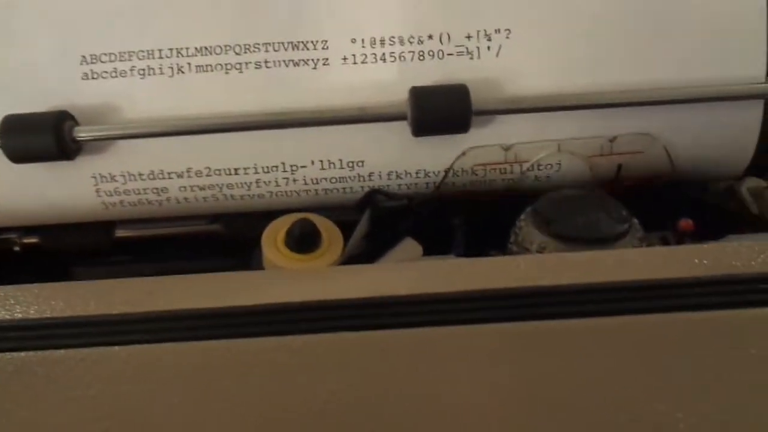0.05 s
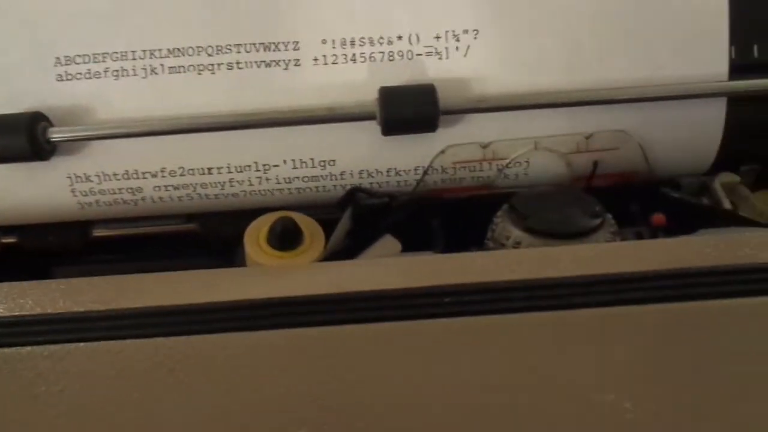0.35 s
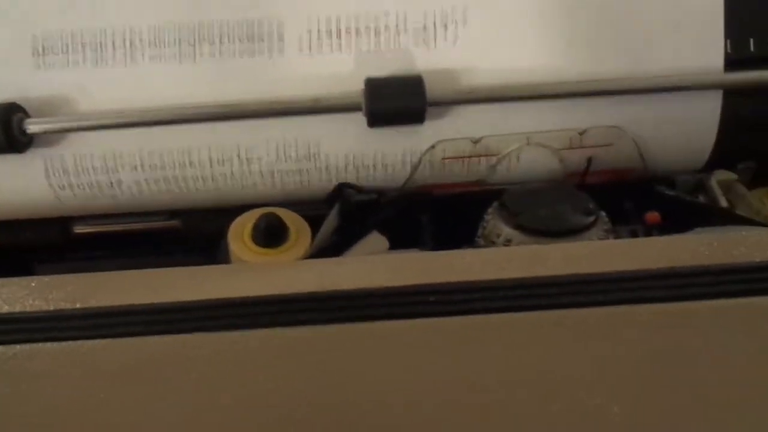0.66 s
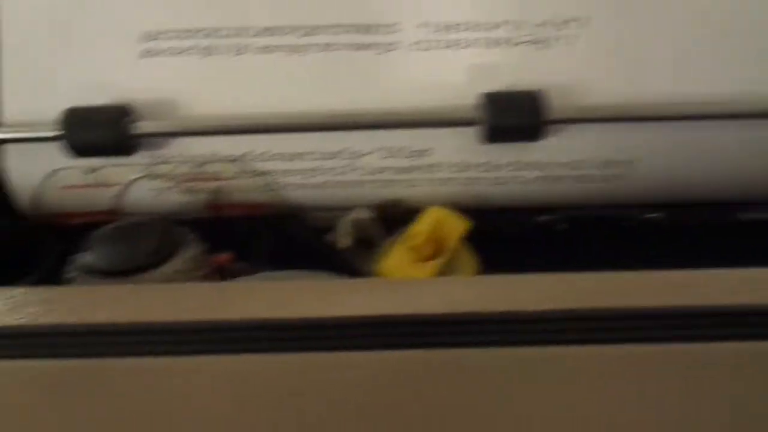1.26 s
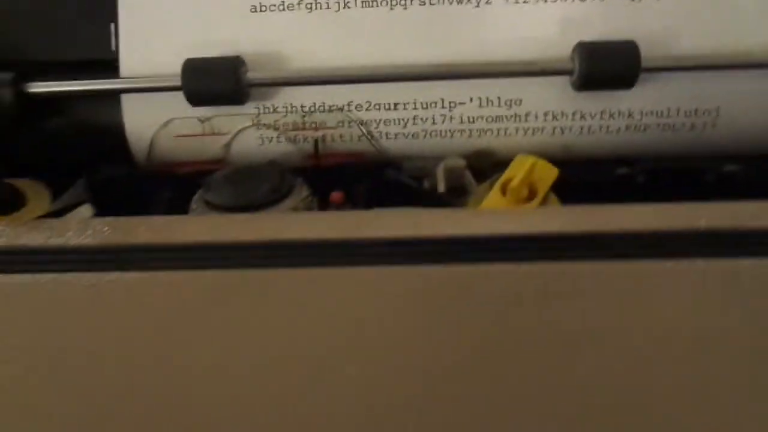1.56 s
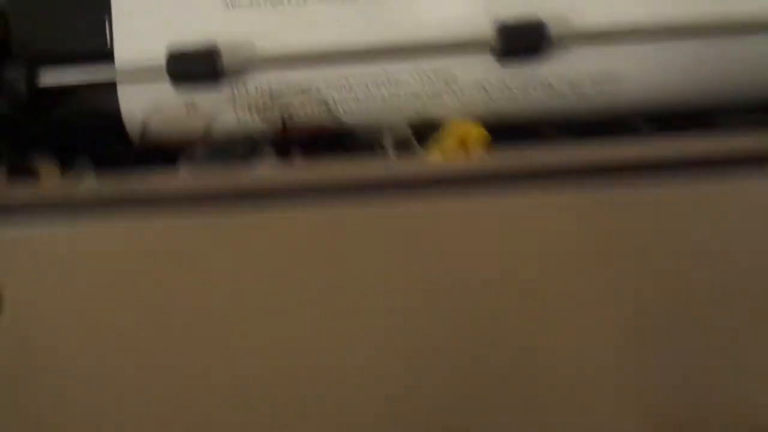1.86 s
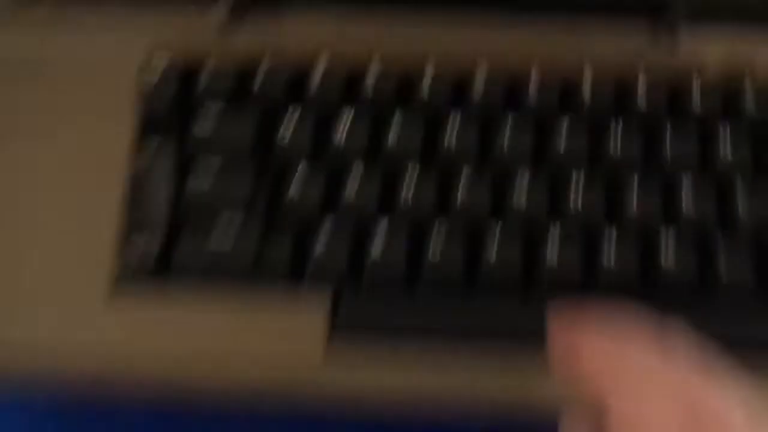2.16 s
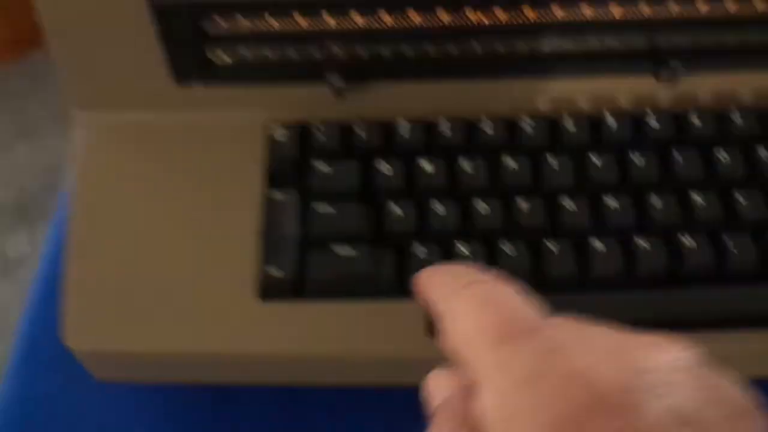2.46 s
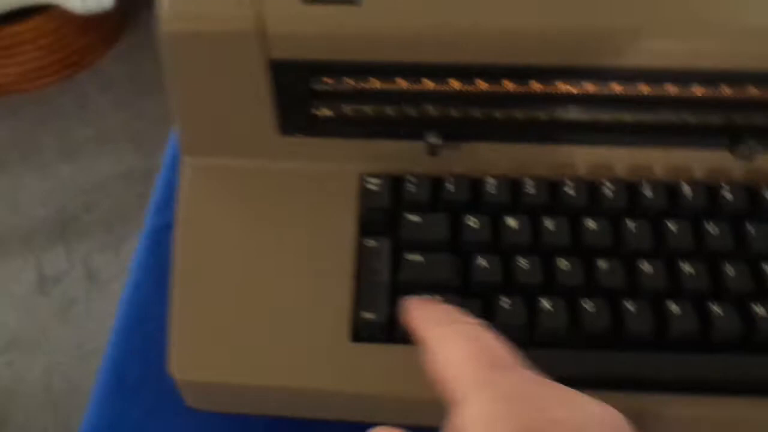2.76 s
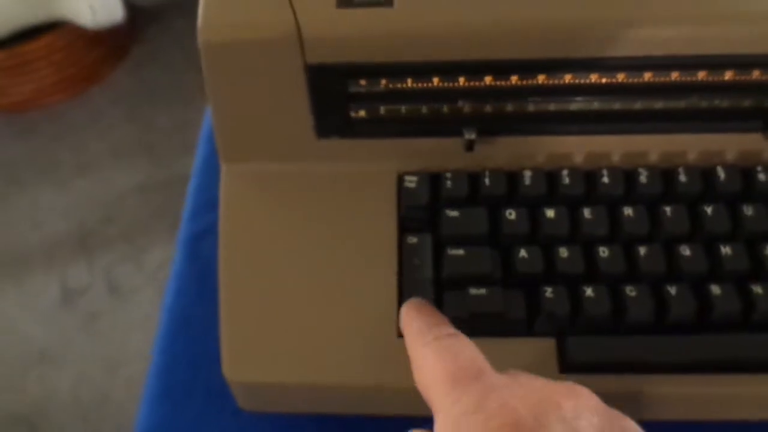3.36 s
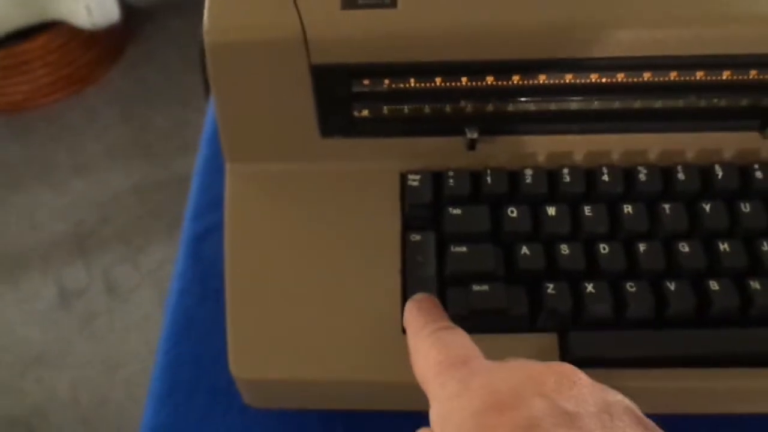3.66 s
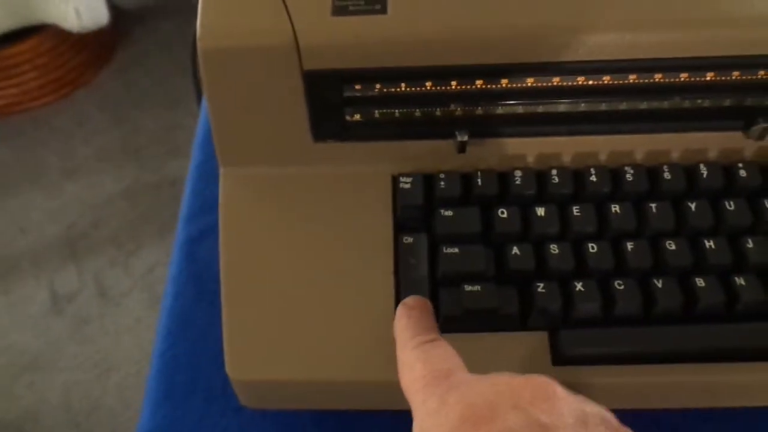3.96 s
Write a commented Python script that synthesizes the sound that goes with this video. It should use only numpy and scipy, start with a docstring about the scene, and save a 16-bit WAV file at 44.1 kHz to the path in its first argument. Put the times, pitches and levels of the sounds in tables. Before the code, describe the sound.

Sharp electric typewriter clacks and a short sliding return, with a lingering bell tone.

```python
"""An electric typewriter clacks close by: its type ball strikes one last letter, the return clutch
grinds, and the carrier (the part that holds the ball) slides back and hits the left stop.
Each clack is a blow of metal on metal that makes the frame, the case and the loose levers ring.
The margin bell, already ringing at the start, dies out over the hum of the motor
while the microphone draws away to the keyboard."""
import sys
import numpy as np
from scipy import signal
from scipy.fft import rfft, irfft
from scipy.io import wavfile

SR = 44100
rng = np.random.default_rng(int(sys.argv[2]) if len(sys.argv) > 2 else 0)


def inscribe(sig):
    """Save sig as 16-bit PCM at rate SR to the path in sys.argv[1].

    A 1-D sig is mono; a 2-D sig holds one channel per row.
    Samples are clipped to [-1, 1] before scaling.
    """
    pcm = np.round(np.clip(np.atleast_2d(sig).T, -1, 1) * 32767)
    wavfile.write(sys.argv[1], SR, pcm.astype(np.int16))


N = 176400
T = np.arange(N) / SR

# Moving parts hitting each other. Each row: start in seconds, level in dB, seconds to fade by 60 dB,
# pitch of the struck part in Hz, its relative ring in dB, relative treble in dB, case thud in dB.
BLOWS = [ (0.0464, -14.5, 0.027, 3080, -3.5, -4.5, -38), (0.0570, -23.5, 0.018, 2520, 6, -21, -40),
         (0.0637, -17, 0.06, 1370, -7, -14, -30), (0.0795, -25, 0.16, 3500, -15, 4, -52.5),
         (0.0926, -14, 0.019, 3180, 2, 3.5, -28.5), (.1000, -11, 0.016, 1435, 11, -4, -20),
         (0.1179, -16.5, 0.047, 12900, 8.5, 14, -23.5), (0.1244, -8.5, 0.043, 3495, -4.5, -18, -28),
         (0.5814, -26.5, 0.018, 11500, 4, -16, -60), (0.588, -25, 0.08, 4530, -11, -9, -64),
         (0.6163, -30, 0.044, 2800, -5, 7, -49), (0.6273, -37, 0.033, 7000, -2, 2, -54),
         (0.6620, -30.5, 0.068, 2840, -5, -5, -39), (0.6700, -35.5, 0.052, 980, 0, -4, -44),
         (0.6809, -19, 0.017, 2380, 1.5, -3, -31), (0.6864, -30, 0.015, 7200, 3, -13, -32),
         (0.6966, -25.5, 0.056, 1110, -4, -9, -40.5), (0.7016, -24, .014, 4700, -5, 11, -35.5),
         (0.7070, -19.5, 0.033, 7100, -20, 4.5, -28.5), (1.0085, -21.5, 0.028, 10700, 1.5, -21, -30.5),
         (1.0121, -15, 0.024, 2300, 1, -4.5, -32), (1.0197, -22.5, 0.028, 1150, 3, 0, -29),
         (1.0281, -19.5, 0.039, 1160, -1, -10, -40), (1.0360, -26, 0.037, 3240, 4, -17, -32),
         (1.0490, -32, .05, 2300, 2, -15, -35.5)]
# How well the bell and shaft whine carry out of the open top as the microphone moves.
# Each row: time in seconds, gain in dB.
OPEN_TOP_GAIN = [(0, -1), (.7, -1.5), (1.1, -0.5), (1.45, -5.5), (1.65, -8), (1.85, -7.5), (2.0, -2),
                 (2.2, -11), (2.45, -20), (2.9, -17.5), (4, -20)]


def from_db(db):
    """Turn decibels into a gain to multiply by."""
    return 10 ** (np.asarray(db) / 20)


def unit_level(x):
    """Scale a sound so that its average (rms) level is 1."""
    return x / np.sqrt(np.mean(x ** 2) + 1e-20)


def in_time(rows):
    """Join (time, value) points with straight lines, one value per sample."""
    return np.interp(T, *np.transpose(rows))


def at_hz(rows, hz):
    """Read between (frequency, value) points, with octaves evenly spaced."""
    freqs, values = np.transpose(rows)
    return np.interp(np.log(hz + 1e-9), np.log(freqs), values)


def fade(t, fade_s):
    """Die away by 60 dB every fade_s seconds."""
    return np.exp(-np.log(1000) * t / fade_s)


def gate(start, end, ramp_s=0.0065):
    """Switch on between two times, with short ramps."""
    return np.clip(np.minimum(T - start, end - T) / ramp_s, 0, 1)


def drift(rate_hz):
    """A smooth random wobble, typically about 1 in size."""
    r = np.exp(-200 * np.pi * rate_hz / SR)
    slow = signal.lfilter([1], [1, -2 * r, r * r], rng.standard_normal(N // 100 + 1002))[1000:]
    return np.interp(np.arange(N) / 100, np.arange(len(slow)), unit_level(slow))


def noise(colour):
    """Noise at level 1, with its lows and highs shaped by (Hz, dB) points."""
    gains = from_db(at_hz(colour, np.fft.rfftfreq(N, 1 / SR)))
    return unit_level(irfft(rfft(rng.standard_normal(N)) * gains, N))


def keep_band(x, hz, kind):
    """Let the lows, the highs or one band through."""
    return signal.sosfilt(signal.butter(2, hz, kind, fs=SR, output="sos"), x)


def resonate(x, hz, q=3.0):
    """Bring out one pitch; a higher q rings longer."""
    r = np.exp(-np.pi * hz / q / SR)
    return signal.lfilter([1 - r, 0, r - 1], [1, -2 * r * np.cos(2 * np.pi * hz / SR), r * r], x)


def add(out, start, x):
    """Mix a sound in at a start time in seconds."""
    i = int(start * SR)
    out[i:i + len(x)] += x[:N - i]


def hiss():
    """The microphone adds a faint, steady hiss."""
    # Each row: frequency in Hz, relative level in dB.
    hiss_colour = [(2000, 4), (5000, -3), (15000, -2)]
    return from_db(-58.5) * noise(hiss_colour)


def motor(motor_hz=58.96, mains_hz=60.3, waver_db=2.7, waver_hz=6):
    """The motor and mains power hum in wavering tones, one shaft whines, and belt and shafts whirr."""
    # Tones of the hum. Each row: multiple of the motor or mains frequency, level in dB.
    motor_tones = [(2, -71), (3, -69.5), (4, -58.5), (5, -63), (6, -71), (12, -70)]
    mains_tones = [(2, -65), (4, -67.5)]
    # Loudness as the microphone moves. Each row: time in seconds, gain in dB.
    hum_gain = [(0, 2.5), (.9, -2.5), (1.45, 1), (2.6, -1)]
    whirr_gain = [(0, 6), (.5, 3), (1.3, 2), (1.7, 1.5), (2.05, .5), (2.5, -1.5), (3, -2), (4, -1)]
    # Belt and shaft noise. Each row: frequency in Hz, relative level in dB.
    whirr_colour = [(30, -31), (85, -17.5), (130, -5), (190, -9.5), (270, 0), (490, -2.5), (580, 4.5),
                    (690, -6), (1000, -3.5), (1500, -13), (6000, -22), (15000, -37)]
    turns = np.cumsum(motor_hz * (1 + .003 * drift(5.3))) / SR
    hum = 0
    for cycles, tones in ((turns, motor_tones), (mains_hz * T, mains_tones)):
        for multiple, db in tones:
            level = from_db(db + waver_db * drift(waver_hz))
            hum += level * np.sqrt(2) * np.sin(2 * np.pi * (multiple * cycles + rng.random()))
    whine_level = from_db(-51 + in_time(OPEN_TOP_GAIN) + waver_db * drift(waver_hz))
    whine = whine_level * np.sin(2 * np.pi * 8 * turns)  # eight cycles per motor turn
    whirr = from_db(-54.5 + in_time(whirr_gain) + 1.5 * drift(7.8)) * noise(whirr_colour)
    return from_db(in_time(hum_gain)) * hum + whine + whirr


def bell(pitch_hz=2382.8, beat_hz=14.14):
    """The bell rings out; its lowest note is two close tones that beat against each other."""
    # Strength of the weaker tone, and so of the beating. Each row: time in seconds, gain in dB.
    twin_gain = [(0, 4), (1.2, -3), (1.7, 5), (2.5, 6), (4, 5)]
    # The bell's higher tones. Each row: pitch in Hz, level in dB, fall in dB per second.
    overtones = [(6000, -43, 14), (10648, -57.5, 69.5)]
    # The carrier shields them and the microphone moves. Each row: time in seconds, gain in dB.
    overtone_gain = [(0, 2.5), (.55, -1), (.74, -8), (.89, 0.5), (.98, -8), (1.12, -5), (1.3, -18.5)]
    age = T + .079  # struck just before the start
    main = from_db(-28 - 5.5 * T) * np.sin(2 * np.pi * pitch_hz * age)
    twin = from_db(-47.5 - 1.5 * T + in_time(twin_gain)) * np.sin(2 * np.pi * (pitch_hz - beat_hz) * age)
    upper = sum(from_db(db - fall * T) * np.sin(2 * np.pi * hz * age) for hz, db, fall in overtones)
    return from_db(in_time(OPEN_TOP_GAIN)) * (main + twin) + from_db(in_time(overtone_gain)) * upper


def carrier_return(start_s=0.582, end_s=1.1, cord_hz=450.6):
    """Clutches grind, and the carrier rubs along its rail while the return cord sings."""
    # Shafts grinding under load. Each row: start in seconds, end in seconds, level in dB.
    clutch_slips = [(0.037, 0.09, -35), (0.565, 0.69, -37), (0.887, 0.923, -53.5)]
    # Rail and clutch noise. Each row: frequency in Hz, relative level in dB.
    rub_colour = [(60, -35), (180, -7), (290, 5.5), (600, -12), (900, 0.5), (1500, -8), (3000, -15.5),
                  (7000, -25), (15000, -30.5)]
    grind_colour = [(100, -14), (400, -1.5), (1000, 8.5), (2000, -8), (4500, -2), (7000, -8.5),
                    (15000, -15.5)]
    cord_level = from_db(-48 + 0.75 * drift(12))
    cord_cycles = np.cumsum(cord_hz * (1 + .005 * drift(5.5))) / SR
    cord = cord_level * np.sqrt(2) * np.sin(2 * np.pi * cord_cycles)
    rub = from_db(-45.5 + 0.63 * drift(33)) * noise(rub_colour)
    slipping = sum(from_db(db) * gate(start, end) for start, end, db in clutch_slips)
    grind = slipping * from_db(3.6 * drift(63)) * noise(grind_colour)
    return gate(start_s, end_s) * (rub + cord) + grind


def rattle(x):
    """Levers and springs store each blow's energy and give it back as a wash; the treble dies first."""
    # Colour of the rattle. Each row: frequency in Hz, gain in dB.
    band_gain = [(100, -13), (400, -3.5), (1200, -12.5), (3300, -5), (5500, -14), (11000, -7)]
    # How long it lasts. Each row: frequency in Hz, seconds to fade by 60 dB.
    band_fade = [(200, 0.36), (2000, 0.17), (6000, .17), (14000, 0.1)]
    edges, tail = np.geomspace(90, 16000, 15), 0
    for low, high in zip(edges, edges[1:]):
        hz = np.sqrt(low * high)
        held = fade(1 / SR, at_hz(band_fade, hz)) ** 2  # share of energy left after one sample
        band = keep_band(x + 1e-12 * rng.standard_normal(N), [low, high], "band")
        energy = signal.lfilter([1 - held], [1, -held], band ** 2)
        wash = unit_level(keep_band(rng.standard_normal(N), [low, high], "band"))
        tail += from_db(at_hz(band_gain, hz)) * np.sqrt(energy) * wash
    return tail


def ringing_body(tones, starts, levels_db, spread_db):
    """Blows set a body ringing; each tone gets a random sign and a level scattered by spread_db."""
    out, t = np.zeros(N), T[:SR // 2]
    rings = np.array([from_db(db) * np.sin(2 * np.pi * hz * t) * fade(t, fade_s)
                      for hz, db, fade_s in tones])
    for start, db in zip(starts, levels_db):
        strengths = from_db(db + spread_db * rng.standard_normal(len(tones)))
        signs = rng.choice([-1, 1], len(tones))
        add(out, start, (strengths * signs) @ rings)
    return out


def metal_hits(bass_hz=492, treble_hz=5200):
    """Each hit is a blow and a brief chatter of metal, coloured by the part that is struck."""
    out, t = np.zeros(N), T[:SR // 10]
    for start, db, fade_s, hz, ring_db, treble_db, _ in BLOWS:
        shape = fade(t, fade_s)
        chatter, push = rng.standard_normal((2, len(t))) * shape
        push[0] = 0.33 * np.linalg.norm(shape)  # the clean first blow
        lows = 1.82 * keep_band(chatter, treble_hz, "low")
        highs = from_db(treble_db - 2.5) * keep_band(chatter, treble_hz, "high")
        crack = keep_band(lows - highs, bass_hz, "high")
        ring = unit_level(resonate(resonate(push, hz), hz)) * np.sqrt(np.mean(shape ** 2))
        add(out, start, from_db(db + 1) * (crack + from_db(ring_db) * ring))
    return out


def clacks(letter_s=.1002, top_hz=14020):
    """Blows shake the case, frame, paper roller and loose parts; returns centre and side sound."""
    # Tones of the case, the steel frame, and the roller and paper table that the type ball strikes.
    # Each row: pitch in Hz, relative level in dB, seconds to fade by 60 dB.
    case_tones = [(135, -17, 0.088), (172.7, -11, .1), (244.7, -10.5, .13), (290, -8, 0.23),
                  (337.4, -6, 0.16), (421.4, -13, 0.11), (483, -8, 0.2), (528, -3.5, 0.14), (720, 0.5, .04)]
    frame_tones = [(1186, -14.5, .11), (1269, -13.5, 0.1), (1387, -16, 0.1), (1556, -19, .09),
                   (1634, -21.5, 0.14), (1846, -18.5, 0.14), (2572, -18, 0.06), (2690, -19.5, .1),
                   (3244, -24, .13), (3360, -21, 0.14), (13138, -23, .07)]
    roller_tones = [(181.8, -32, .42), (760, -17, .08), (783, -47.5, 2.1), (1588, -43, 0.52)]
    # How wide the clacks sound. Each row: time in seconds, side gain in dB.
    width = [(.16, -11), (.3, -32.5)]
    starts, levels_db, *_, thuds_db = np.transpose(BLOWS)
    hits = metal_hits()
    case = keep_band(ringing_body(case_tones, starts, thuds_db, spread_db=-1.0), 55, "high")
    frame = ringing_body(frame_tones, starts, levels_db, spread_db=0.0)
    roller = ringing_body(roller_tones, [letter_s], [0], spread_db=2.5)
    bodies = frame + case + roller
    side = from_db(in_time(width)) * rattle(hits + bodies)
    centre = hits + rattle(hits) + bodies
    return signal.sosfilt(signal.butter(6, top_hz, fs=SR, output="sos"), [centre, side])


def scene():
    """The loud first clack sounds slightly wide; everything after it sits almost in the centre."""
    centre, side = clacks()
    centre = centre + bell() + motor() + carrier_return() + hiss()
    return np.array([centre + side, centre - side])


def record(dry, limit_db=1.5, attack_s=0.00059, release_db_per_s=446.5, clip_level=1.5, top_hz=15100):
    """A fast limiter dips the level after an overload; peaks are rounded and the top treble is cut."""
    over_db = np.maximum(20 * np.log10(np.abs(dry).max(axis=0) + 1e-9) - limit_db, 0)
    dip_db = np.maximum.accumulate(over_db + release_db_per_s * T) - release_db_per_s * T
    lag = np.exp(-1 / (attack_s * SR))
    limited = dry * from_db(-signal.lfilter([1 - lag], [1, -lag], dip_db))
    rounded = limited / (1 + (limited / clip_level) ** 4) ** .25
    return signal.sosfilt(signal.ellip(10, .2, 70, top_hz, fs=SR, output="sos"), rounded)


dry = scene()
out = record(dry)
inscribe(out)
```